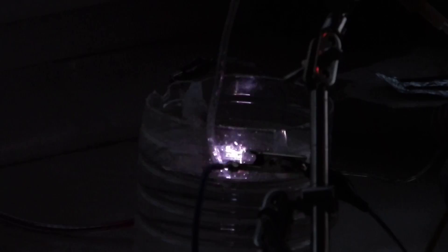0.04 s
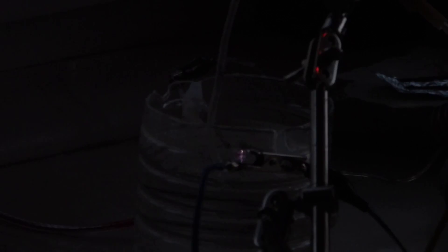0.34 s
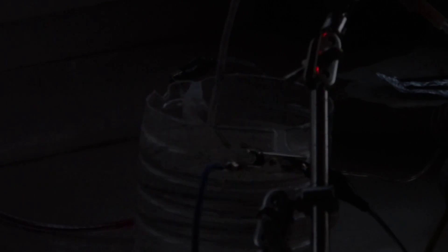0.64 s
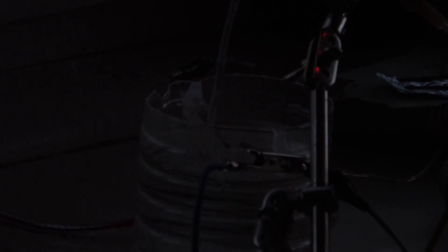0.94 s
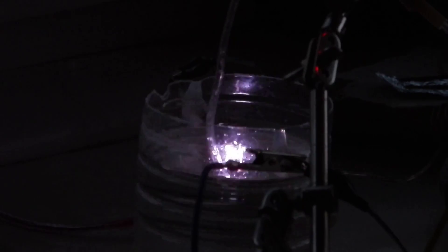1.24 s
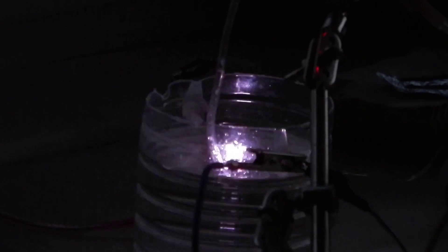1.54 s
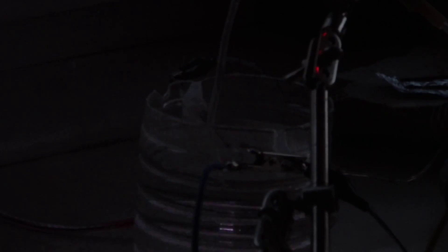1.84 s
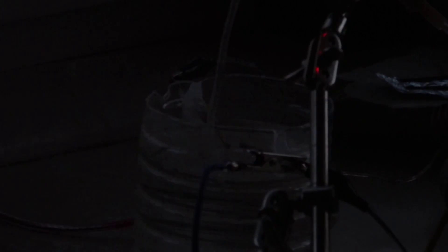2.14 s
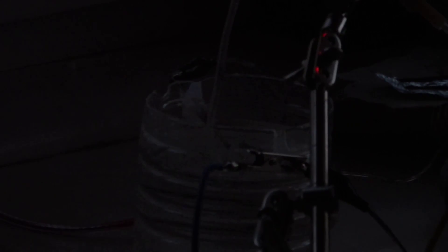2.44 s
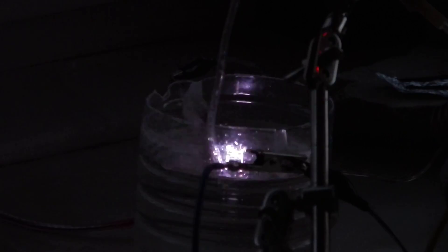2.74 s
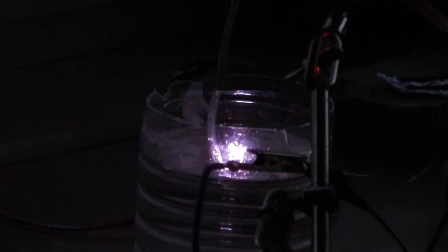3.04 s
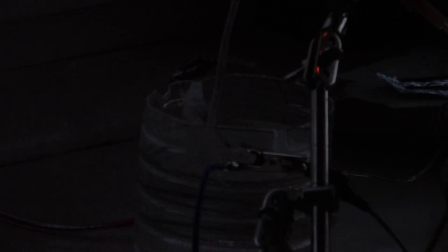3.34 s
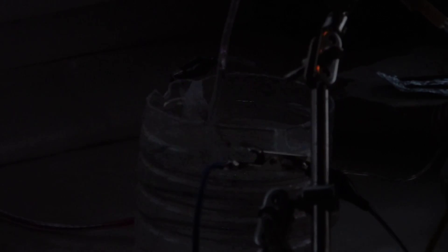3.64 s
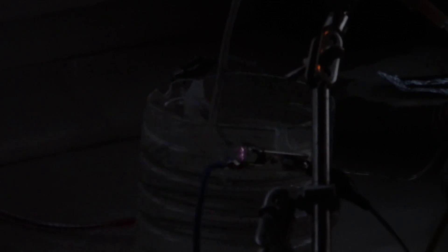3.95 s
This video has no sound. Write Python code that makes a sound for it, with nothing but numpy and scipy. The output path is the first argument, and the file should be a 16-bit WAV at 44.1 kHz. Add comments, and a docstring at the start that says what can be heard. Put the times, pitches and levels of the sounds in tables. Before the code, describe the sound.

Electric sparks snap and crackle rapidly inside a jar in a small hard room.

```python
"""A small hard room, two microphones close to an open jar with electrodes inside.
High-voltage sparks jump the gap about 29 times a second, strong snaps alternating unevenly with weak
ticks. Each is one bright crack with the same close echoes and nearly the same ringing tail.
The strongest also make the jar thud and boom. One dull knock falls among them, over faint room tone."""
import sys
import numpy as np
from scipy import signal
from scipy.fft import rfft, irfft
from scipy.io import wavfile

SR = 44100
rng = np.random.default_rng(int(sys.argv[2]) if len(sys.argv) > 2 else 0)


def inscribe(sig):
    """Save sig as 16-bit PCM at rate SR to the path in sys.argv[1].

    A 1-D sig is mono; a 2-D sig holds one channel per row.
    Samples are clipped to [-1, 1] before scaling.
    """
    pcm = np.round(np.clip(np.atleast_2d(sig).T, -1, 1) * 32767)
    wavfile.write(sys.argv[1], SR, pcm.astype(np.int16))


N = 176400

# spectrum of the room tone: f/Hz, relative level/dB
ROOM_TONE_SPECTRUM = [(25, -10), (60, -9), (130, -13), (250, -7), (500, -8), (1200, 6), (3000, 1),
                      (15000, -5.5)]
# contacts within the knock: t/s after the first, relative level/dB
KNOCK_CONTACTS = [(0, -14), (.0026, 7.5), (.0033, 1), (.0118, -1)]
# spectrum of one contact: f/Hz, relative level/dB
KNOCK_SPECTRUM = [(150, -38), (300, -21), (520, -7.5), (800, -7.5), (1250, -2.5), (1700, -5), (2100, -1),
                  (2500, -19.5), (2900, -20), (3500, -9), (4100, -26), (8000, -54)]
# spectrum of the jar's thud: f/Hz, relative level/dB
THUD_SPECTRUM = [(40, -9.5), (120, 1.5), (350, 2), (700, 3.5), (1200, -5.5), (2500, -48), (6000, 0)]
# modes of jar and room that ring on after a spark: f/Hz, relative level/dB
RINGING_MODES = [(1098, -23), (1290, -40.5), (1626, -23.5), (2046, -30.5), (5981, -17.5), (9555, -11),
                 (9749, -6.5), (10244, -13.5), (11030, -21), (11859, -30), (13469, -10.5), (13641, 3),
                 (13921, -7.5), (14858, -10)]
# paths from gap to microphones by jar, bench and walls: delay/ms, treble level/dB, lower level/dB
CLOSE_PATHS = [(0, -1, -5), (0.25, -2, -6), (.7, -7, -11), (1.35, -1, -13), (1.6, 0, -9), (2.4, -1, 4),
               (2.8, -4, 0), (3.2, 0, -1), (4.15, -8, -13), (4.8, -7, -14), (8.5, -2, -18), (8.8, -5, -18),
               (36.4, -14, -17), (37.5, -13, -16), (44.1, -16, -20)]
# spectrum of a crack: f/Hz, relative level/dB
CRACK_SPECTRUM = [(250, -36), (800, -28), (1100, -22.5), (1700, -17), (2200, -21.5), (2550, -28),
                  (2900, -20.5), (4900, -17.5), (5650, -3), (6800, -11), (8600, -9.5), (9600, -1.5),
                  (10700, -4.5), (11700, -1.5), (12500, -7), (13600, -2.5), (15000, -3), (15900, -12.5)]
# strong discharges, each layer on its own scale: t/s, crack level/dB, thud level/dB, boom level/dB
SNAPS = [(0.0618, -16.5, -55, -60), (0.1297, -20.5, -53, -64), (0.1651, -16, -39, -53.5),
         (0.2333, -19.5, -52, -73.0), (0.2676, -16, -40, -55.5), (0.3018, -16.5, -37.5, -53),
         (0.3704, -14, -38.5, -50), (0.4737, -18.5, -46, -61), (0.5766, -16, -44, -55),
         (0.612, -15, -41.5, -57), (0.7143, -17, -42, -59), (0.801, -17.5, -58, -58),
         (0.8463, -23.5, -56.0, -78), (0.8786, -14, -45, -48.5), (0.9809, -18, -60, -63),
         (1.1205, -22.8, -55, -84.0), (1.1531, -14, -46, -53.5), (1.222, -13, -50, -50.5),
         (1.2572, -16, -41, -56), (1.2907, -20, -55.0, -70.0), (1.3943, -17.5, -48, -72),
         (1.4297, -19, -45, -64), (1.4628, -20.5, -64.0, -69), (1.4969, -18, -39.5, -59),
         (1.5673, -16.5, -36.5, -58), (1.6345, -19, -38.5, -63), (1.6708, -22, -73, -85.0),
         (1.7027, -19, -43, -62), (1.7382, -19.5, -55.0, -61), (1.8066, -19, -45, -64),
         (1.8408, -20.5, -61, -84), (1.909, -20.0, -47, -62), (2.0467, -18.5, -37.5, -58),
         (2.0821, -17, -42, -61), (2.1155, -17.5, -38.5, -67.0), (2.1501, -20.5, -58, -67),
         (2.2193, -20, -40.5, -59), (2.2541, -18, -36, -55), (2.2872, -19, -56, -57),
         (2.3553, -20, -63, -83.0), (2.4843, -15, -48.0, -55), (2.5531, -16.5, -39.5, -57),
         (2.5875, -17.5, -40.5, -60), (2.6565, -16.5, -35.5, -56), (2.7249, -15.0, -39, -54),
         (2.793, -16.5, -39, -62.0), (2.8288, -17, -38, -57), (2.8962, -17, -44, -54.0),
         (2.9321, -20, -45, -59.0), (3.0, -17, -47.0, -53), (3.0681, -18, -35.5, -58),
         (3.1372, -14, -49.0, -51.5), (3.2064, -16.5, -43, -61), (3.2417, -16, -43, -51.5),
         (3.3086, -18.5, -52, -59), (3.3443, -19.5, -45, -61), (3.3781, -18, -45, -60.0),
         (3.4126, -19.5, -69, -68), (3.4476, -18, -45, -58), (3.5496, -17.5, -43.5, -65),
         (3.5847, -16, -39, -57.0), (3.6515, -17.5, -45, -55.5), (3.686, -16.5, -40.5, -53),
         (3.7559, -18.5, -46, -64), (3.7908, -20, -52, -64), (3.8243, -17.5, -43, -54),
         (3.8589, -18.5, -44, -58), (3.8936, -20, -52.0, -58), (3.9282, -16.5, -40, -64.0),
         (3.9958, -16.5, -46.0, -51)]
# weak discharges, on the scale of the snaps: t/s, crack level/dB
TICKS = [(.0002, -24.5), (0.0247, -25), (0.0966, -26), (0.201, -30), (0.336, -28), (0.405, -26.5),
         (0.4398, -23.5), (0.5078, -22), (0.5416, -23), (0.6474, -29), (0.679, -25), (.749, -29.5),
         (0.9155, -34), (0.949, -27.5), (1.0177, -24.5), (1.0506, -23.5), (1.085, -26), (1.1875, -25.5),
         (1.325, -33), (1.3604, -27), (1.533, -38), (1.6015, -43), (1.774, -32), (1.8735, -36),
         (1.945, -22), (1.978, -29), (2.0124, -28.5), (2.1855, -28.5), (2.321, -30), (2.385, -31),
         (2.4191, -28), (2.4512, -28), (2.5192, -28.5), (2.6237, -28), (2.692, -28), (2.7604, -29),
         (2.861, -27.5), (2.9655, -28.5), (3.0359, -26.5), (3.103, -27.5), (3.1737, -24.5), (3.275, -28),
         (3.4822, -31), (3.5145, -27), (3.6197, -32), (3.721, -29), (3.964, -31)]
# gain on the difference between the microphones: f/Hz, level/dB
STEREO_WIDTH = [(60, -13.5), (400, -9.5), (1200, -13), (2500, -50), (5500, -12), (10000, -5), (15000, -4)]

ROOM_TONE_DB, HUM_HZ, HUM_DB = -53.5, 392, -73
KNOCK_S, KNOCK_GAIN_DB, KNOCK_TAIL_DB, KNOCK_T60_S = 0.8105, -0.5, -2.5, 0.15
CRACK_GAIN_DB, THUD_GAIN_DB, BOOM_GAIN_DB = 14.5, 29.5, 32   # added to the discharge levels
THUD_DELAY_S, THUD_JITTER_S, THUD_TAIL_DB = 0.0025, 0.00014, -23.5
BOOM_HZ, BOOM_T60_S = 72, 0.023
MODES_GAIN_DB, MODES_T60_S = -22, 0.12
TAIL_GAIN_DB, TAIL_T60_S, TAIL_BUILD_S = 7, 0.22, 0.0027
TAIL_CHANGE = 0.32   # part of the tail that differs from spark to spark
SCATTER, SCATTER_S = 0.7, 0.00012   # the curved walls smear every path
SPLIT_HZ = 8740   # divides a path's treble from its lower part
CLOSE_SIDE_DB = -10   # close paths reach both microphones more alike than the tail
SPUTTER, SPUTTER_S = 0.057, 0.00012   # ragged start of each discharge
THIN_BELOW_DB, THIN_PER_DB = -21.5, 0.2   # weaker sparks are shorter pulses, with less midrange
HOLLOW_HZ, HOLLOW_WIDTH_HZ = 2540, 300   # narrow dip in the cracks' midrange
RIGHT_DB, RUMBLE_CUT_HZ, TOP_CUT_HZ = 0.5, 46, 15900
RESPONSE_SAMPLES = 16384


def from_db(db):
    """Decibels to gain."""
    return 10 ** (np.asarray(db) / 20)


def unit(x):
    """Scale to energy 1."""
    return x / np.sqrt(np.sum(x ** 2) + 1e-20)


def gains(spectrum, size):
    """A spectrum's gain at each frequency of a transform."""
    hz, db = np.transpose(spectrum)
    bin_hz = np.arange(size // 2 + 1) * SR / size
    return from_db(np.interp(np.log(bin_hz + 1), np.log(hz), db))


def pulse(spectrum):
    """Shortest causal pulse with this spectrum, energy 1."""
    size = RESPONSE_SAMPLES
    cepstrum = irfft(np.log(gains(spectrum, size)))
    cepstrum[1:size // 2] *= 2
    cepstrum[size // 2 + 1:] = 0
    return unit(irfft(np.exp(rfft(cepstrum)))[:size // 8])


def through(x, response):
    """Pass a sound through a response."""
    return signal.fftconvolve(x, response)[:len(x)]


def clicks(times, heights, size=N):
    """Single clicks at the given times in seconds."""
    out = np.zeros(size)
    np.add.at(out, np.clip(np.round(times * SR).astype(int), 0, size - 1), heights)
    return out


def room_tone():
    """Faint room noise with a thin hum in the centre: (mid, side)."""
    noise = np.array([through(x, pulse(ROOM_TONE_SPECTRUM)) for x in rng.standard_normal((2, N))])
    hum = np.sqrt(2) * np.sin(2 * np.pi * HUM_HZ * np.arange(N) / SR)
    return from_db(ROOM_TONE_DB) * noise + from_db(HUM_DB) * hum * [[1], [0]]


def room_tail(t60=TAIL_T60_S):
    """Dense echoes off the hard walls build up and die away, energy 1."""
    t = np.arange(RESPONSE_SAMPLES) / SR
    build_up = 1 - np.exp(-t / TAIL_BUILD_S)
    return unit(rng.standard_normal(len(t)) * from_db(-60 * t / t60) * build_up)


def knock():
    """A dull knock of a few quick contacts, dead centre, with the room around it: (mid, side)."""
    after, db = np.transpose(KNOCK_CONTACTS)
    contacts = from_db(KNOCK_GAIN_DB) * unit(clicks(KNOCK_S + after, from_db(db)))
    hit = through(contacts, pulse(KNOCK_SPECTRUM))
    room = np.array([through(hit, room_tail(KNOCK_T60_S)) for _ in range(2)])
    return hit * [[1], [0]] + from_db(KNOCK_TAIL_DB) * room


def jar():
    """Just after a strong crack the jar thuds, and booms a little to the right: (mid, side)."""
    times, _, thud_db, boom_db = np.transpose(SNAPS)
    times = times + THUD_DELAY_S + THUD_JITTER_S * rng.standard_normal(len(times))
    thud_heights, thud_pulse = from_db(thud_db + THUD_GAIN_DB), pulse(THUD_SPECTRUM)
    thud = through(clicks(times, -thud_heights), thud_pulse)
    thud_side = through(clicks(times, thud_heights * rng.standard_normal(len(times))), thud_pulse)
    t = np.arange(RESPONSE_SAMPLES) / SR
    low_ring = unit(np.cos(2 * np.pi * BOOM_HZ * t) * from_db(-60 * t / BOOM_T60_S))
    boom = through(clicks(times, -from_db(boom_db + BOOM_GAIN_DB)), low_ring)
    room = from_db(THUD_TAIL_DB) * through(thud, room_tail())
    return np.array([thud + boom + room, 1.3 * thud_side - 0.67 * boom])


def ringing():
    """Jar and room ring on in their modes, each a dying sine."""
    t = np.arange(RESPONSE_SAMPLES) / SR
    fade_db = MODES_GAIN_DB - 60 * t / MODES_T60_S
    return sum(from_db(db + fade_db) * np.sin(2 * np.pi * hz * t + rng.uniform(0, 2 * np.pi))
               for hz, db in RINGING_MODES)


def close_paths(signs):
    """First arrivals at the microphones, each a little smeared, with a treble and a lower part."""
    delay_ms, treble_db, lower_db = np.transpose(CLOSE_PATHS)
    t = np.arange(SR // 1000) / SR
    scatter = SCATTER * rng.standard_normal((len(signs), len(t))) * np.exp(-t / SCATTER_S)
    smears = np.array([sign * unit((t == 0) + noise) for sign, noise in zip(signs, scatter)])
    response = np.zeros(RESPONSE_SAMPLES)
    for band, db in (("high", treble_db), ("low", lower_db)):
        arrivals = clicks(delay_ms[:, None] / 1000 + t, from_db(db)[:, None] * smears, len(response))
        response += signal.sosfilt(signal.butter(4, SPLIT_HZ, band, fs=SR, output="sos"), arrivals)
    return response


def discharges():
    """Each spark leaves the gap as a ragged click: (sample times, heights), one row a spark."""
    onsets, db = np.vstack([np.array(SNAPS)[:, :2], TICKS]).T
    t = np.arange(SR // 1000) / SR
    ragged = (t == 0) + SPUTTER * rng.standard_normal((len(onsets), len(t))) * np.exp(-t / SPUTTER_S)
    thinness = np.clip((THIN_BELOW_DB - db) * THIN_PER_DB, 0, 1)[:, None]
    shapes = (ragged - thinness * np.roll(ragged, 1, axis=1)) / np.hypot(1, thinness)
    return onsets[:, None] + t, from_db(db + CRACK_GAIN_DB)[:, None] * shapes


def cracks():
    """The sparks from close by: they arrive along the short paths, then ring in the room: (mid, side)."""
    times, heights = discharges()
    sparks = clicks(times, heights)
    wander = rng.uniform(0, 2 * np.pi, (len(times), 1))   # a spark never takes quite the same path
    varying_parts = [clicks(times, heights * turn(wander)) for turn in (np.cos, np.sin)]
    left_right = (-1) ** np.arange(len(CLOSE_PATHS))   # echoes come from either side in turn
    mid_paths = close_paths(abs(left_right))
    side_paths = from_db(CLOSE_SIDE_DB) * close_paths(left_right)
    channels = []
    for paths in (mid_paths, side_paths):
        room = through(sparks, room_tail())
        room += TAIL_CHANGE * sum(through(part, room_tail()) for part in varying_parts)
        arrivals = through(sparks, paths) + from_db(TAIL_GAIN_DB) * room
        channels.append(through(arrivals, pulse(CRACK_SPECTRUM)))
    channels[0] += through(sparks, ringing())
    hollow = signal.iirnotch(HOLLOW_HZ, HOLLOW_HZ / HOLLOW_WIDTH_HZ, fs=SR)
    return signal.lfilter(*hollow, channels)


def scene():
    """All sources, nearly centred before the close pair of microphones: (left, right)."""
    mid, side = cracks() + jar() + knock() + room_tone()
    side = irfft(rfft(side) * gains(STEREO_WIDTH, N), N)
    balance = from_db([[-RIGHT_DB / 2], [RIGHT_DB / 2]])
    return np.array([mid + side, mid - side]) * balance


def record(dry):
    """The recorder cuts rumble, rounds the highest peaks and cuts the top steeply."""
    x = signal.sosfilt(signal.butter(2, RUMBLE_CUT_HZ, "high", fs=SR, output="sos"), dry)
    x = x / (1 + x ** 4) ** 0.25   # soft ceiling at full scale
    return signal.sosfilt(signal.cheby1(14, 0.1, TOP_CUT_HZ, fs=SR, output="sos"), x)


dry = scene()
out = record(dry)
inscribe(out)
```